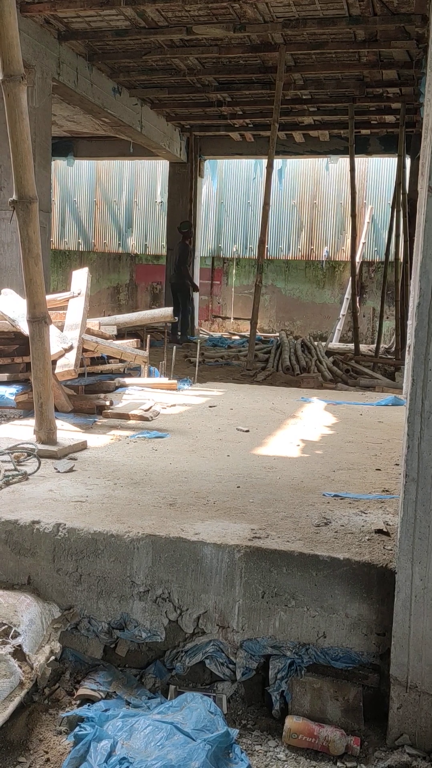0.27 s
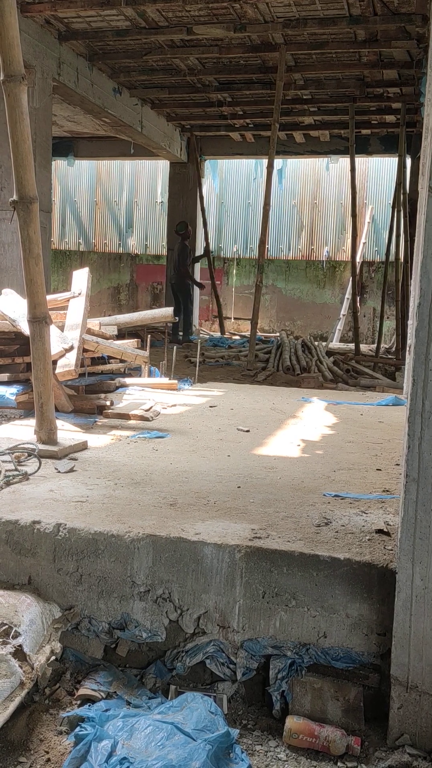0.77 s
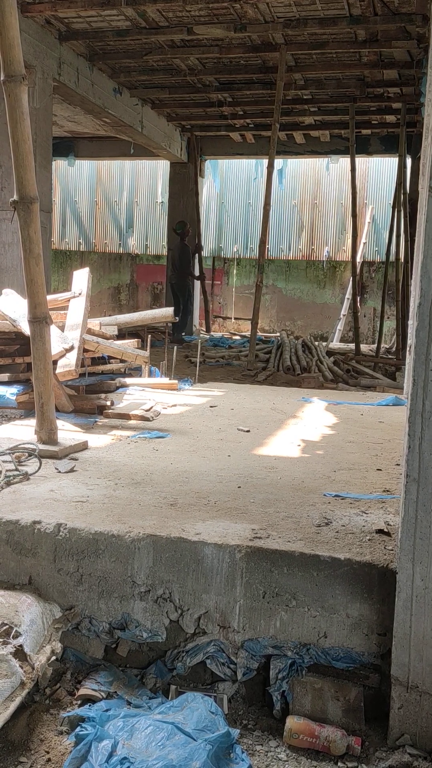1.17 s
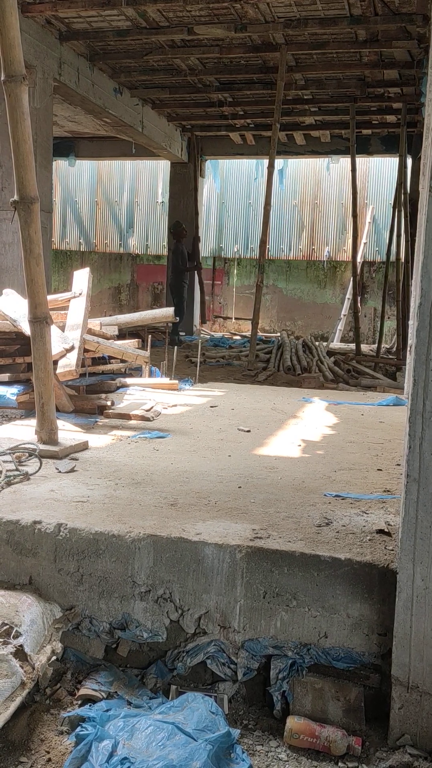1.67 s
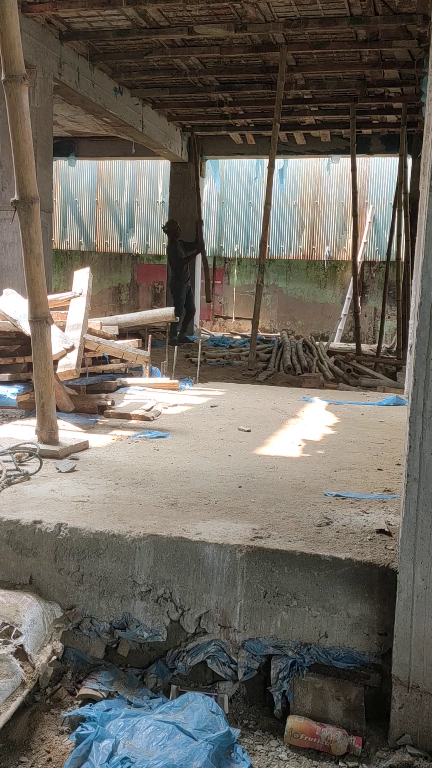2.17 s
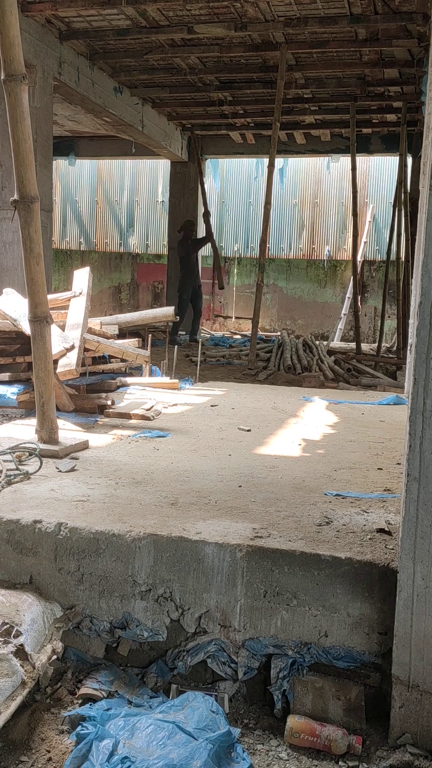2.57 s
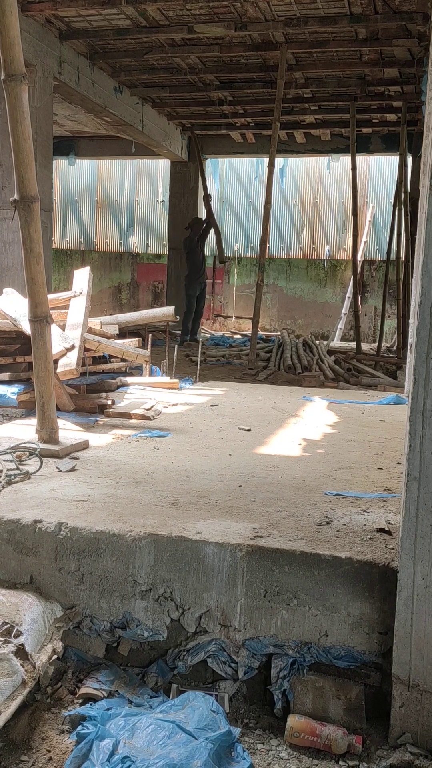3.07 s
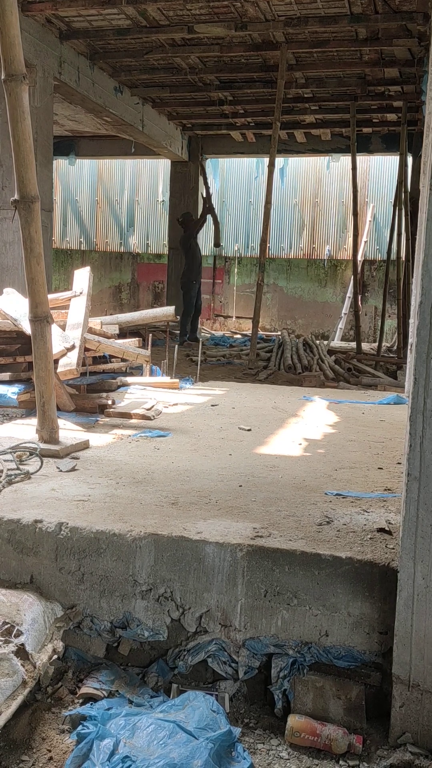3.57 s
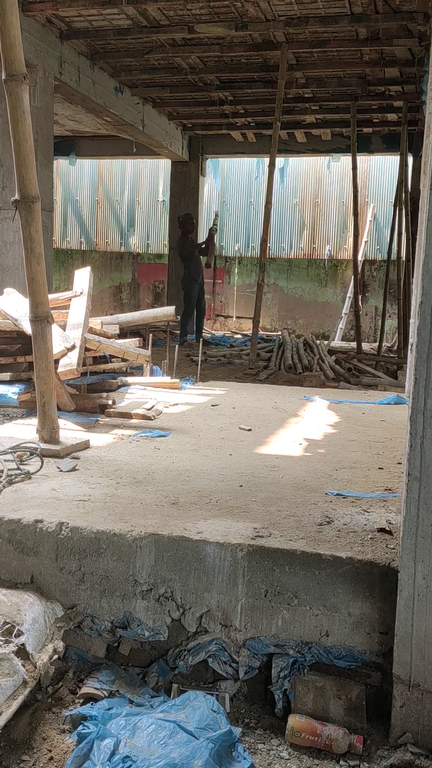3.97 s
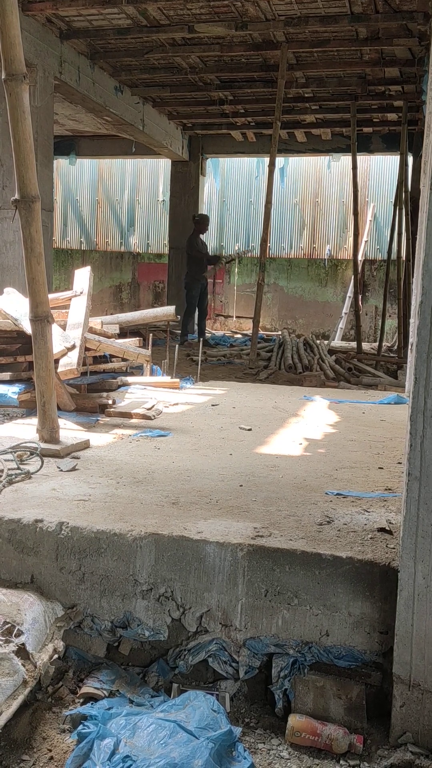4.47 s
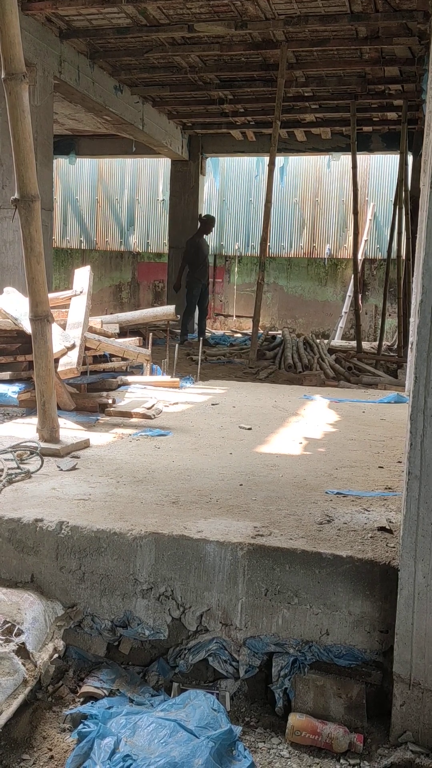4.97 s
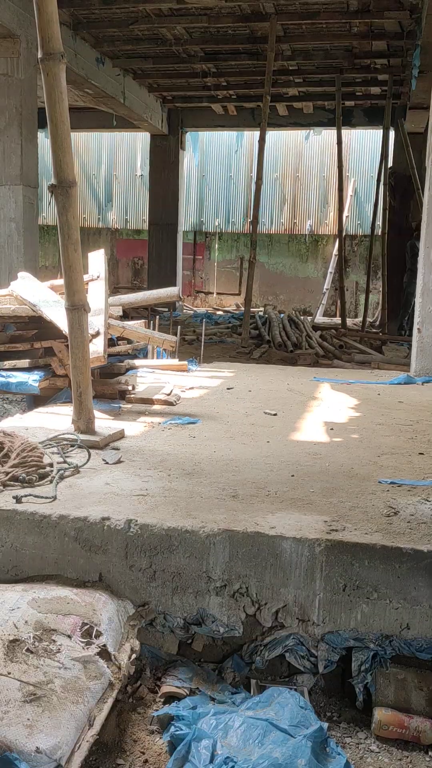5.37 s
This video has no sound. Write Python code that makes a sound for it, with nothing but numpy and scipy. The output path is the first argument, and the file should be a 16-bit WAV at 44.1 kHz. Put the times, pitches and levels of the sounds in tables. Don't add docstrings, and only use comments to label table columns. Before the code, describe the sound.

Steady, hollow wooden knocks from the far end of a reverberant concrete building site, each with a dull boom and wall echoes lasting under a second. Sharp little metal taps fall between them, and dust hisses faintly. Later blows ring and rattle as the boards loosen; after a dull final hit they tumble down in a dense, distorted clatter. The sound breaks off briefly, a scrap returns, then an abrupt change to low rumble as something heavy passes. Distant stereo pickup.

```python
import sys
import numpy as np
from scipy import signal
from scipy.fft import irfft
from scipy.io import wavfile
from scipy.ndimage import uniform_filter1d

SR = 44100
rng = np.random.default_rng(int(sys.argv[2]) if len(sys.argv) > 2 else 0)


def wrap_up_sound(samples):
    columns = np.atleast_2d(samples).T
    tamed = np.clip(columns, -1, 1)
    steps = np.round(tamed * 32767).astype(np.int16)
    wavfile.write(sys.argv[1], SR, steps)


def to_linear_factor(level_db):
    exponent = np.asarray(level_db, float) / 20
    return 10 ** exponent


N = 247842
CUT_S = 5.188

# frequency in Hz, level in dB per Hz.
CRACK_COLOUR = [(500, -25), (1200, 0), (2400, 1), (4200, 0), (6000, -5), (9000, -8), (12000, -18),
                (16000, -26.5)]


def evened(x):
    return x / np.sqrt(np.mean(x ** 2) + 1e-20)


def read(points, at):
    key, value = np.transpose(points)
    return np.interp(np.log(at + 1), np.log(key + 1), value)


def add(mix, start_s, sound):
    part = mix[..., round(start_s * SR):][..., :sound.shape[-1]]
    part += sound[..., :part.shape[-1]]


def humps(peaks, hz):
    return sum(to_linear_factor(2 * db) / (1 + (2 * (hz - f) / width) ** 2) for f, width, db in peaks)


def noise(spectrum, count, peaks=None, peaks_db=0, dying=0, patchy_db=0):
    # frequency in Hz, t60 in seconds.
    storey_t60 = [(100, 0.94), (260, 0.96), (700, 0.77), (1840, 0.75), (4850, 0.52), (12800, 0.36)]
    # frequency in Hz, left-right likeness from -1 to 1.
    likeness = [(60, 0.92), (180, 0.93), (550, 0.59), (1650, -0.086), (4970, 0.035), (15000, -0.13)]
    hz = np.fft.rfftfreq(1024, 1 / SR)[:, None]
    t = np.arange(count // 256 + 5) * 256 / SR
    a, b, c, d, patches = rng.standard_normal((len(t), 513, 5)).T
    power = to_linear_factor(2 * read(spectrum, hz))
    if peaks:
        power = power + to_linear_factor(2 * peaks_db) * humps(peaks, hz)
    patches = evened(uniform_filter1d(uniform_filter1d(patches, 8, 0), 10, 1))
    same = np.clip(read(likeness, hz), -1, 1)
    left = a + 1j * b
    right = same * left + np.sqrt(1 - same ** 2) * (c + 1j * d)
    gain = np.sqrt(power) * to_linear_factor(patchy_db * patches - 60 * dying * t / read(storey_t60, hz))
    return signal.istft(np.array([left, right]) * gain, nperseg=1024, noverlap=768)[1][:, :count]


def storey(spectrum, late_s, rise_s, echoes=(), count=36000, **colour):
    t = np.arange(count) / SR
    swell = np.clip((t - late_s) / rise_s, 0, 1) ** 2
    echo_db = sum(db * np.exp(-((t - s) / width) ** 2) for s, width, db in echoes)
    wash = noise(spectrum, count, **colour) * swell * to_linear_factor(echo_db)
    return wash / np.sqrt(np.mean(wash[:, :SR // 10] ** 2, 1, keepdims=True))


def clicks(times, db, chatter=0, hardness_db=0):
    hz, train = np.fft.rfftfreq(256, 1 / SR), np.zeros(N)
    shuffle = np.cumsum(rng.standard_normal((len(times), len(hz))), 1) * hz / 5000
    octaves = np.log2(np.maximum(hz, 1000) / 5000)
    tilt_db = np.outer(hardness_db + np.zeros(len(times)), octaves)
    contacts = irfft(to_linear_factor(db[:, None] + tilt_db) * np.exp(1j * chatter * shuffle), axis=1)
    for s, contact in zip(times, np.roll(contacts, 128, 1)):
        add(train, s - 128 / SR, contact)
    return train[None]


def through(train, response):
    return signal.fftconvolve(train, response, axes=1)[:, :N]


def rings(modes, soft_s, count=36000):
    t = np.arange(count) / SR
    sines = sum(to_linear_factor(db - 60 * t / t60) * np.sin(-2 * np.pi * hz * t) for hz, db, t60 in modes)
    return sines * (1 - np.exp(-t / soft_s)) ** 2


def site():
    # frequency in Hz, level in dB per Hz.
    site_colour = [(20, 0.8), (70, 3.3), (160, -13.5), (400, -22), (1000, -27.5), (4000, -37.5),
                   (13500, -47.5), (16000, -82)]
    # frequency in Hz, width in Hz, level in dB.
    hum_modes = [(172.7, 3.6, -53), (62.3, 12, -53.5)]
    air = to_linear_factor(-42) * evened(noise(site_colour, N, patchy_db=1.0))
    for hz, width, db in hum_modes:
        resonator = signal.iirpeak(hz, hz / width, SR)
        air += to_linear_factor(db) * evened(signal.lfilter(*resonator, rng.standard_normal(N)))
    return air


def later(count):
    # frequency in Hz, level in dB per Hz.
    later_colour = [(10, -23), (20, 14), (65, -7), (300, -10), (700, -22.5), (2500, -36.5), (6000, -49.5),
                    (16000, -55.5)]
    far_knock = 5.311, -52, [(670, 40, 3), (950, 120, -8), (2100, 40, -16)]
    pass_s, coming_s, going_s = 5.39, 0.14, 0.27
    t = CUT_S + np.arange(count) / SR
    near = np.exp(-((t - pass_s) / np.where(t < pass_s, coming_s, going_s)) ** 2)
    air = evened(noise(later_colour, count, patchy_db=-1.0))
    low = signal.sosfiltfilt(signal.butter(2, 220, fs=SR, output="sos"), air)
    mid = signal.sosfiltfilt(signal.butter(2, 1800, fs=SR, output="sos"), air - low)
    rumble = evened(low) * to_linear_factor(-51 + 10.5 * near)
    clatter = evened(mid) * to_linear_factor(-58.5 + 10 * near)
    out = rumble + clatter + to_linear_factor(-39.5) * (air - low - mid)
    at_s, knock_db, tones = far_knock
    knock = storey([(300, -30), (1000, -16), (3000, -30), (8000, -50)], .0005, .003, peaks=tones, dying=1.8)
    add(out, at_s - CUT_S, to_linear_factor(knock_db) * knock)
    return out


def grit():
    # middle in seconds, length in seconds, level in dB.
    trickles = [
        (0.598, 0.036, -62),
        (.84, .03, -52),
        (2.1, 0.065, -57.5),
        (3.059, 0.099, -55),
        (3.291, 0.036, -58.5),
        (5.266, 0.034, -58),
    ]
    t = np.arange(N) / SR
    trickle = sum(to_linear_factor(db) * np.exp(-((t - s) / length) ** 2) for s, length, db in trickles)
    return trickle * evened(noise([(2000, 0.5), (6000, -5.5), (12000, -7), (16000, -8.0)], N))


def fall():
    # start in seconds, knock level in dB, pitch in Hz, crack level in dB.
    falling_boards = [(4.752, -13, 1217, -37.5), (4.759, -5, 789, -14), (4.782, -5, 2050, -13.5),
                      (4.797, -1, 806, -10), (4.820, 0.3, 730, -31.5), (4.838, -2.6, 827, -15),
                      (4.856, -7.5, 1370, -21.5), (4.877, -9, 928, -9.5), (4.890, -3.5, 495, -32.5),
                      (4.914, -22, 503, -26.5), (4.945, -12, 363, -26), (5.03, -18.5, 734, -30),
                      (5, -12, 350, -26.5)]
    # frequency in Hz, level in dB per Hz.
    knock_colour = [(60, -38), (200, -9), (350, 0), (800, 5), (1500, 4.5), (2300, -3), (4000, -38),
                    (6000, -30)]
    # frequency in Hz, level in dB per Hz.
    floor_colour = [(60, -8), (110, -8.5), (180, -14.5), (280, -3.5), (400, -4.5), (600, -35)]
    s, knock_db, pitch_hz, crack_db = np.transpose(falling_boards)
    crack_colour = CRACK_COLOUR[:-2] + [(13500, -19), (14800, -34.5), (16000, -55)]
    cracks = clicks(s, crack_db - 12.5, 0.53)
    heap = through(cracks, storey(crack_colour, 0.00073, 0.0082, [(.006, 0.0023, 4.9)], dying=0.84))
    place_db = 1 * (-1) ** np.arange(len(s))
    for at_s, db, pitch, side_db in zip(s, knock_db, pitch_hz, place_db):
        knock = storey(knock_colour, 0.00061, 0.0087, count=15000, peaks=[(pitch, 160, 7)], dying=1.54)
        ring = to_linear_factor([[side_db], [-side_db]]) * rings([(pitch, 0, .09)], 0.0034, count=15000)
        add(heap, at_s, to_linear_factor(db - 15.5) * (knock + to_linear_factor(12) * ring))
    heap += through(clicks(s, knock_db - 29.5), storey(floor_colour, 0.0022, 0.035, dying=0.69))
    return heap * to_linear_factor([[.6], [-.6]])


def taps():
    # start in seconds, tick level in dB, ring level in dB, hardness in dB per octave.
    steel_taps = [
        (0.186, -54, -54.5, -8),
        (0.632, -57, -57, 0.5),
        (0.8326, -32.5, -37, -6),
        (1.643, -49, -60, 8),
        (2.0264, -48.5, -58, 2),
        (2.1161, -23, -31.5, -0.5),
        (2.285, -26.5, -37, -3.5),
        (2.4889, -30, -27, -5),
        (2.5421, -44, -43, -11),
        (2.7755, -32.5, -45, -5.5),
    ]
    # frequency in Hz, level in dB per Hz.
    tick_colour = [(500, -45), (1000, -22), (2200, -7), (4500, -8.5), (8000, -1.5), (11000, -8),
                   (14000, -10), (16000, -25)]
    # frequency in Hz, width in Hz, level in dB.
    steel_modes = [(1258, 83, 0.5), (2170, 100, -15), (3840, 92, -13), (4800, 83, -10.5)]
    # frequency in Hz, width in Hz, level in dB.
    wash_peaks = [(1250, 150, -17), (1450, 350, 0), (4150, 360, -1.5), (4800, 400, -9), (6400, 700, -11)]
    s, tick_db, ring_db, hardness_db = np.transpose(steel_taps)
    pan_db = -3.5 + 12 * np.exp(-s / .55)
    t = np.arange(36000) / SR
    ahead = 1 + 2.3 * np.exp(-((t - .006) / 0.0034) ** 2)
    tick = ahead * storey(tick_colour, 0.00064, 0.0011, dying=0.86)
    ring = to_linear_factor(13.5) * rings([(hz, db, 3.7 / width) for hz, width, db in steel_modes], 0.0016)
    wash = storey([(300, -26), (1200, -8.0), (5000, -29)], .002, 0.0074,
                  peaks=wash_peaks, peaks_db=-8.5, dying=1.24)
    ring = ring + to_linear_factor(-1) * wash
    ticks = [clicks(s, tick_db - 17.5 + side * pan_db, 0.18, hardness_db)[0] for side in (.5, -.5)]
    return through(np.array(ticks), tick) + through(clicks(s, ring_db - 7.0), ring)


def blows():
    # start in seconds, board rattle in dB, crack in dB, hardness in dB per octave.
    blow_rows = [
        (0.223, -33, -29, 3),
        (0.712, -34.5, -24.5, 5.5),
        (1.208, -32, -26.5, 2.5),
        (1.696, -30.5, -25, 5),
        (2.185, -30.5, -24, 5.5),
        (2.663, -29.5, -24, 5.5),
        (3.136, -22, -23, 2.5),
        (3.628, -17.5, -26.5, 9),
        (4.096, -16, -23.5, 5.9),
        (4.622, -16.5, -28, -2),
    ]
    # frequency in Hz, level in dB, t60 in seconds.
    thump_modes = [(205.6, 5, 0.028), (527, -9, 0.049)]
    # frequency in Hz, level in dB, t60
    # in seconds.
    slab_modes = [(58.6, -11, 0.92), (117.8, 0, 0.65), (143.8, -0.5, 0.73), (172, 2, 0.42),
                  (173.8, -5, 1.66),
                  (242, -8, .4), (272, -3, .5), (308, -3, .4), (358, 0.5, .32)]
    # frequency in Hz, level in dB, t60 in seconds.
    board_modes = [(547, -2, .28), (592, 3, .25)]
    # frequency in Hz, width in Hz, level in dB.
    board_peaks = [(526, 350, -6.5), (628, 24, -0.5), (756, 40, -2), (890, 120, -11.5), (1308, 160, 0.5),
                   (1473, 140, -5.5), (1890, 85, -10.5), (2176, 81, -12)]
    # frequency in Hz, level in dB per Hz.
    board_colours = [
        [(90, -44), (200, -11), (350, -8), (450, -18.5), (900, -15), (1100, -48)],
        [(700, -26.5), (900, -1), (2000, -15), (3500, -14.5), (6000, -48)],
    ]
    # delay in seconds, width in seconds, level in dB.
    board_echoes = [(.017, .004, -4), (.0245, .003, 7), (.04, .004, 4), (.055, .003, 2), (.078, .003, 3)]
    # delay in seconds, width in seconds, level in dB.
    crack_echoes = [(0.032, 0.0056, 5), (0.046, 0.0038, 3), (.078, .004, 2), (0.104, 0.0062, 2)]
    s, high_db, crack_db, hardness_db = np.transpose(blow_rows)
    slab_db = -18 - 11.5 * np.exp(-s / 0.52)
    low_db = np.where(s < 2.9, -36, -22)

    slab = to_linear_factor(7.5) * rings(thump_modes[:1], 0.0022) + to_linear_factor(-8.5) * rings(slab_modes, 0.019)
    slab_colour = [(40, -21.5), (100, 1), (165, 4), (350, -1.5), (450, -7), (700, -56.5)]
    slab = slab + to_linear_factor(-11) * storey(slab_colour, 0.0031, 0.0055, dying=0.98)

    low = to_linear_factor(17.5) * rings(thump_modes[1:], 0.0022) + to_linear_factor(7.5) * rings(board_modes, 0.022)
    low = low + storey(board_colours[0], 0.0034, 0.031, board_echoes,
                       peaks=board_peaks[:3], peaks_db=2.5, dying=0.96)
    high = storey(board_colours[1], 0.00093, 0.02, board_echoes,
                  peaks=board_peaks[3:], peaks_db=4.5, dying=1.116)
    crack, stray = (storey(CRACK_COLOUR, 0.0076, 0.012, crack_echoes, peaks=[(2780, 190, 1.8)], dying=1.034)
                    for _ in range(2))

    drift_rad = .6 * rng.standard_normal(len(s))
    cracks = clicks(s, crack_db - 5.0, .05, hardness_db)
    drift_rad = drift_rad[np.searchsorted(s - .01, np.arange(N) / SR) - 1]
    out = through(clicks(s, slab_db - 2.5), slab)
    out = out + through(clicks(s, low_db - 5), low) + through(clicks(s, high_db - 3.5), high)
    out = out + through(cracks * np.cos(drift_rad), crack) + through(cracks * np.sin(drift_rad), stray)
    before = to_linear_factor(-29.0) * slab + to_linear_factor(-38.5) * low + to_linear_factor(-42) * high + to_linear_factor(-37.0) * crack
    add(out, 0, before[:, SR // 4:])
    lag_samples = 8
    return np.array([to_linear_factor(1.33) * np.roll(out[0], lag_samples), to_linear_factor(-0.68) * out[1]])


def scene():
    first = blows() + taps() + fall() + site()
    stall, resume, cut = (round(s * SR) for s in (5.0418, 5.148, CUT_S))
    out = np.zeros((2, N))
    out[:, :stall] = first[:, :stall]
    out[:, resume:cut] = first[:, stall:stall + cut - resume]
    out[:, cut:] = later(count=N - cut)
    return out + grit() * (out != 0)


def low_pass(x):
    return signal.sosfilt(signal.butter(12, 16060, fs=SR, output="sos"), x)


def record(dry):
    lowpass = signal.firwin(255, 16100, window=("kaiser", 9), fs=SR)
    limited = signal.oaconvolve(np.clip(dry, -1, 1), lowpass[None], "same")
    return low_pass(limited)


dry = scene()
out = record(dry)
wrap_up_sound(out)
```